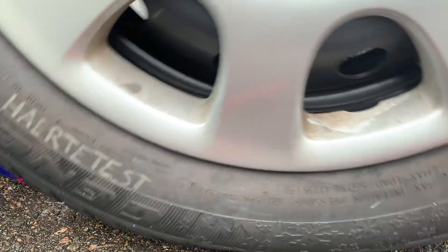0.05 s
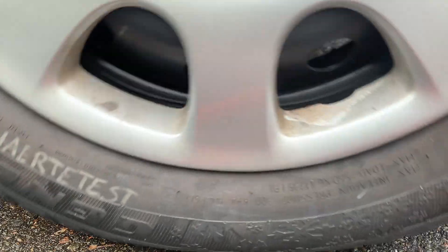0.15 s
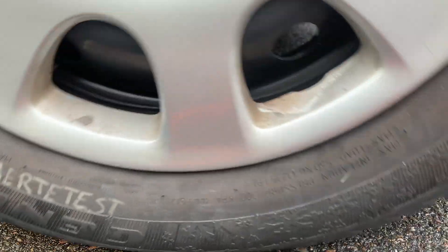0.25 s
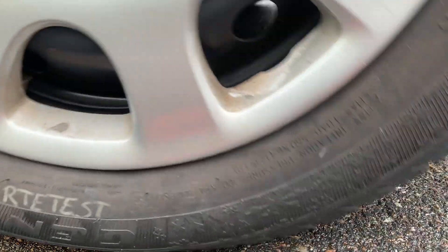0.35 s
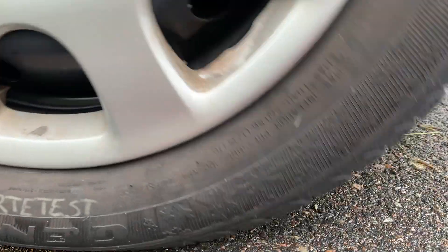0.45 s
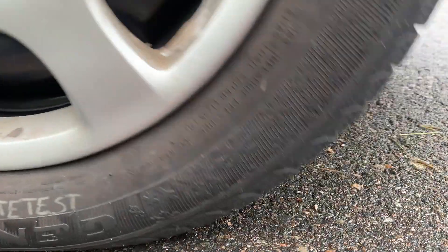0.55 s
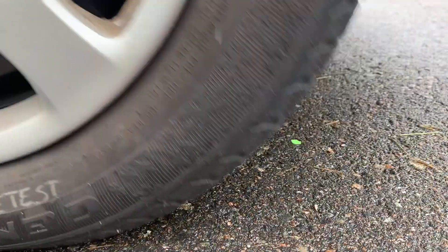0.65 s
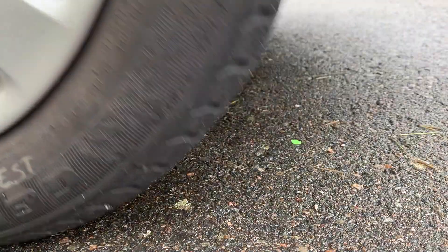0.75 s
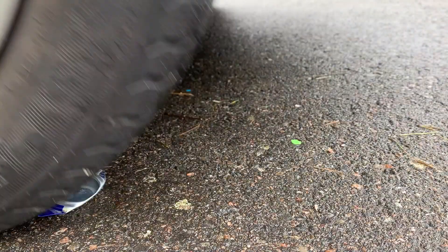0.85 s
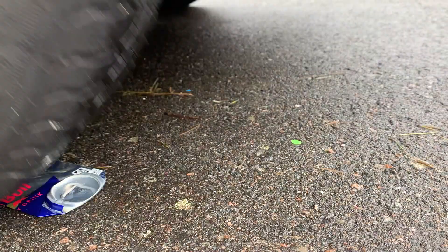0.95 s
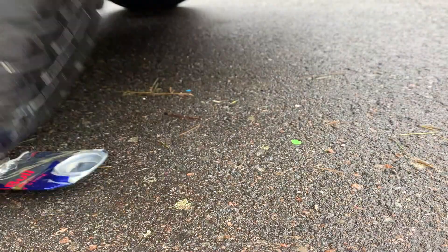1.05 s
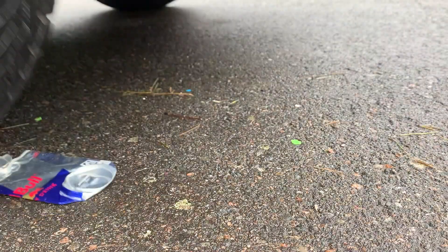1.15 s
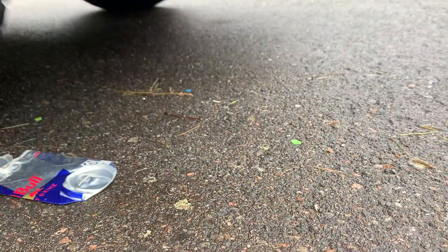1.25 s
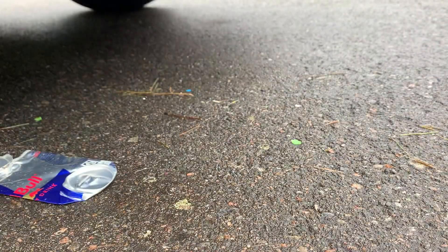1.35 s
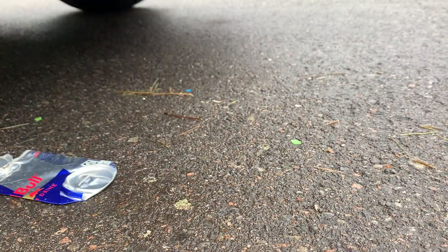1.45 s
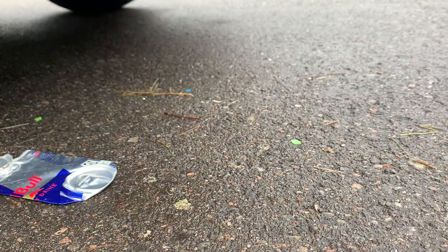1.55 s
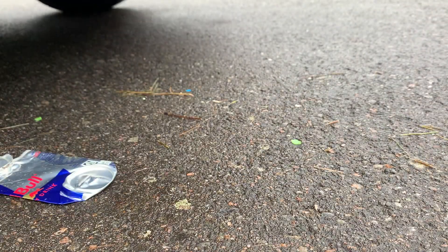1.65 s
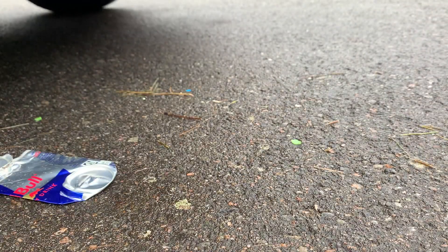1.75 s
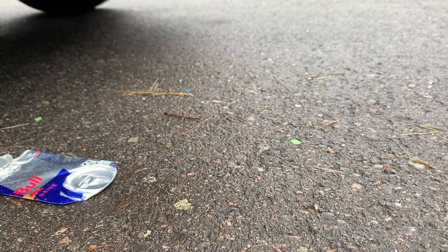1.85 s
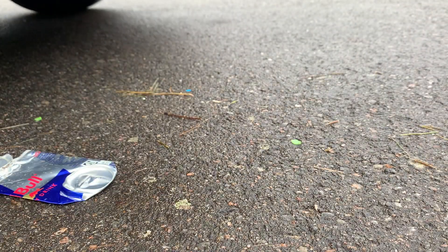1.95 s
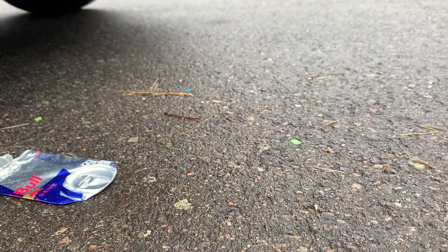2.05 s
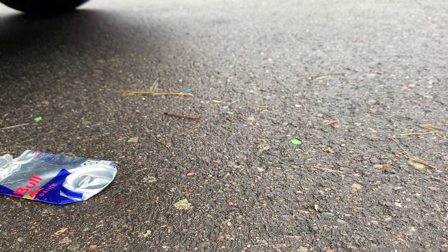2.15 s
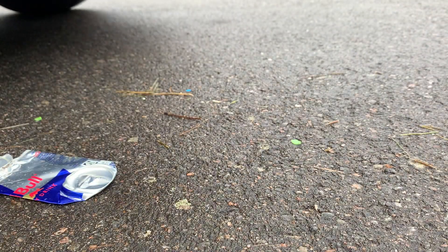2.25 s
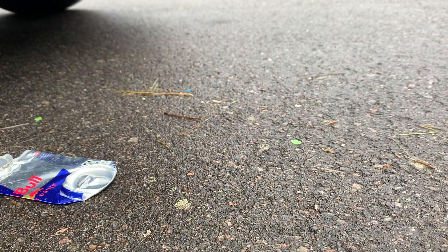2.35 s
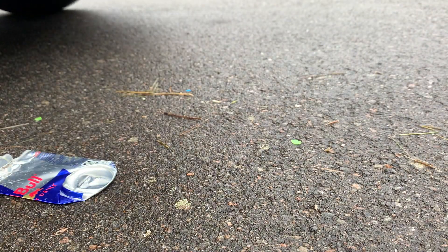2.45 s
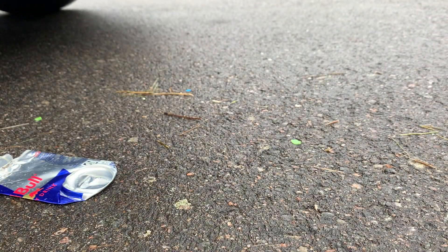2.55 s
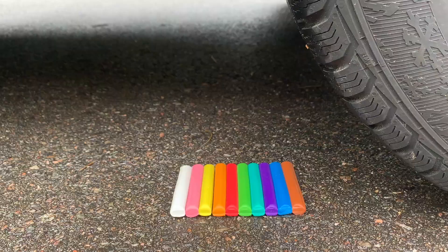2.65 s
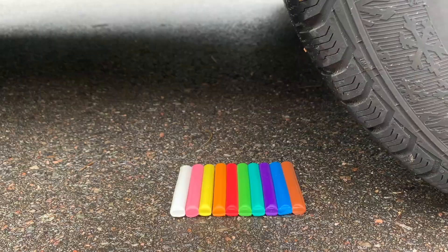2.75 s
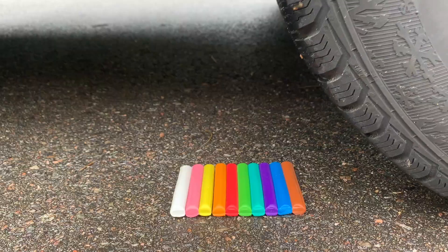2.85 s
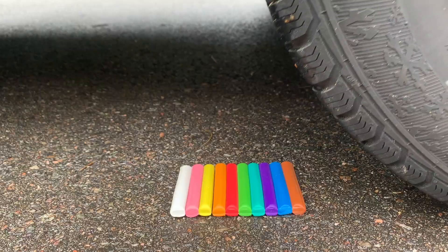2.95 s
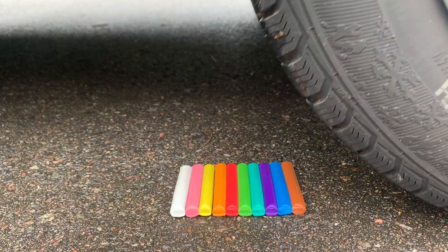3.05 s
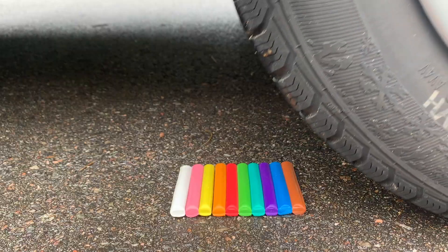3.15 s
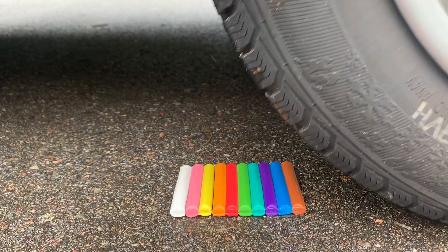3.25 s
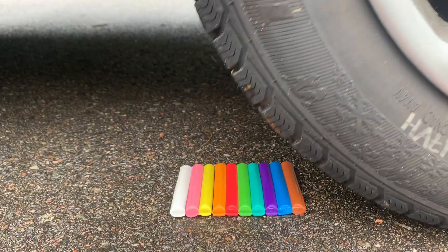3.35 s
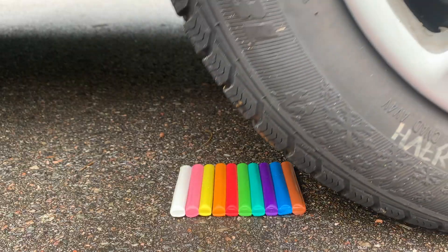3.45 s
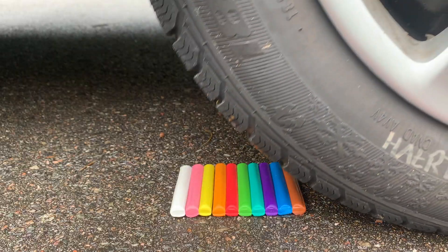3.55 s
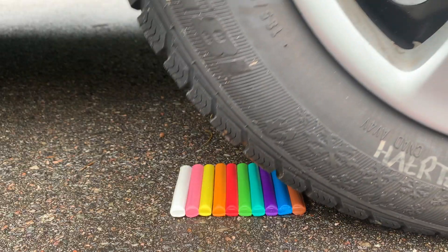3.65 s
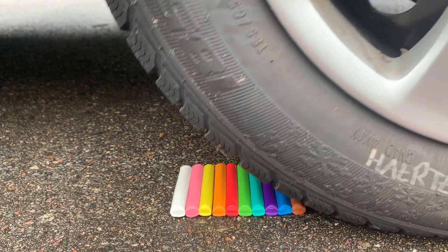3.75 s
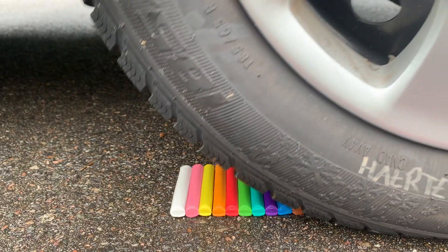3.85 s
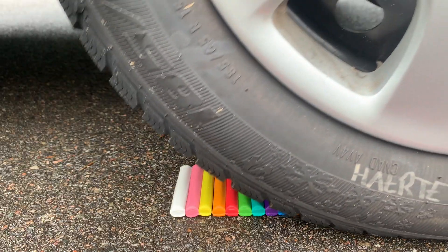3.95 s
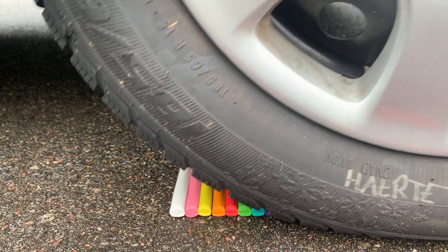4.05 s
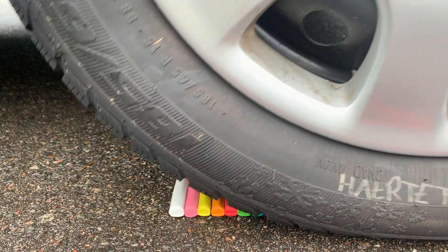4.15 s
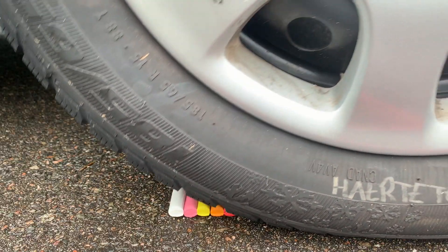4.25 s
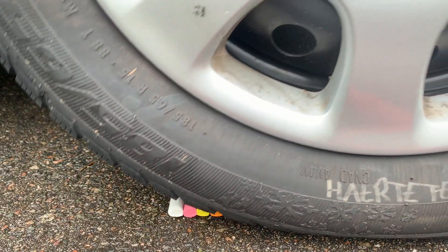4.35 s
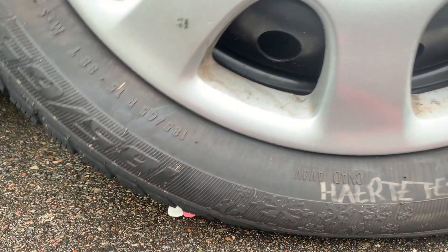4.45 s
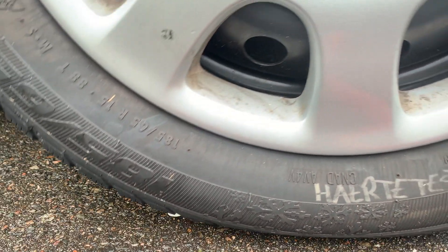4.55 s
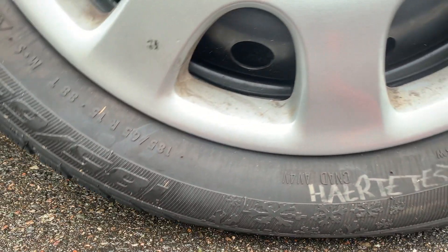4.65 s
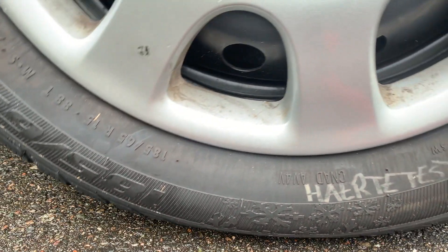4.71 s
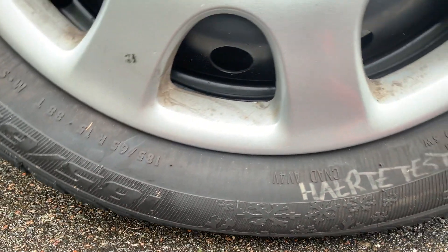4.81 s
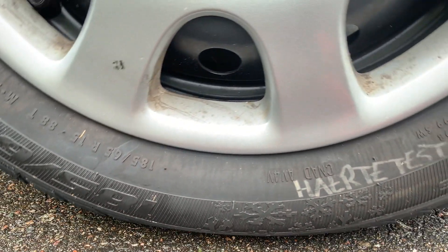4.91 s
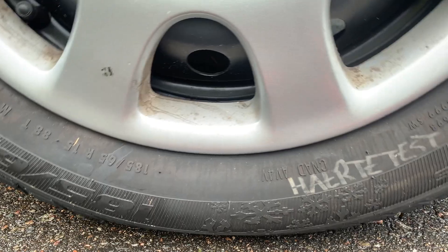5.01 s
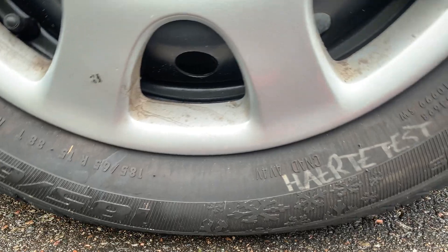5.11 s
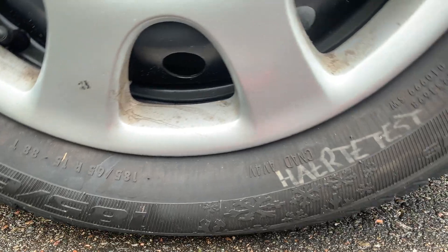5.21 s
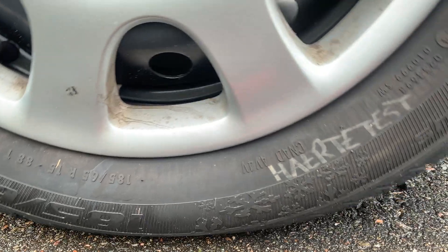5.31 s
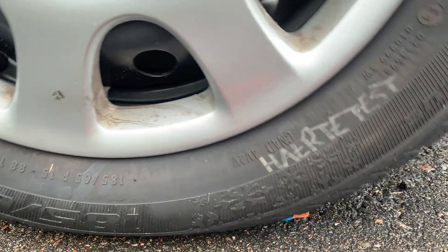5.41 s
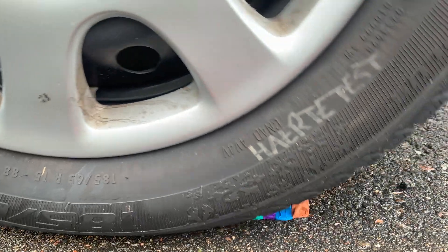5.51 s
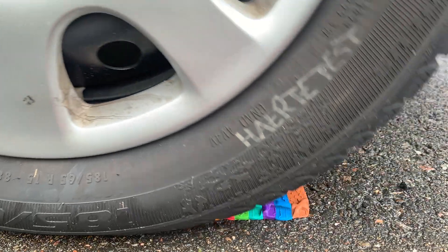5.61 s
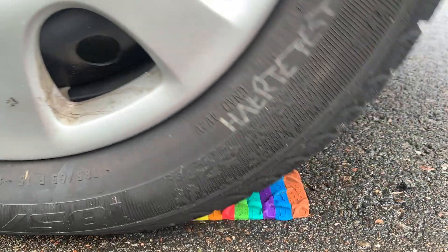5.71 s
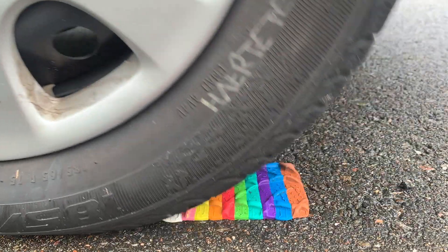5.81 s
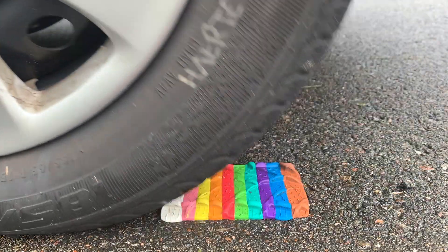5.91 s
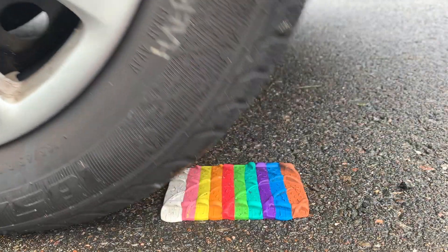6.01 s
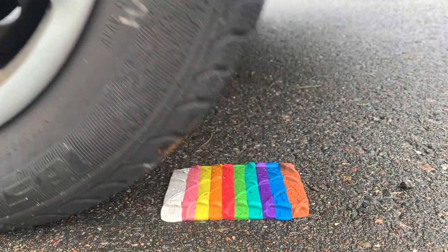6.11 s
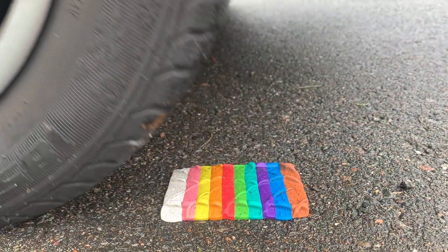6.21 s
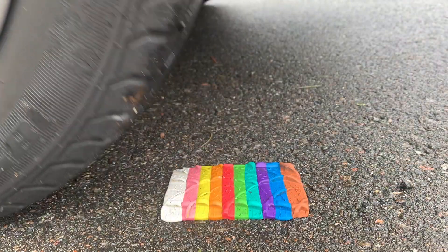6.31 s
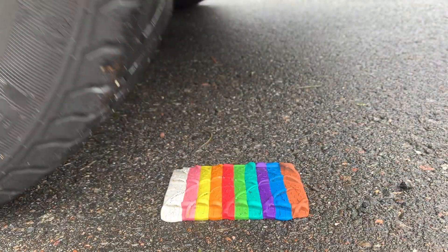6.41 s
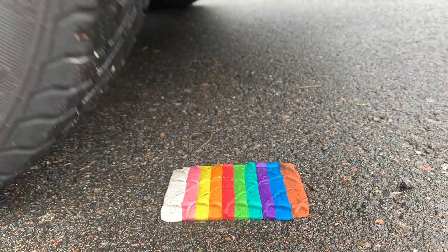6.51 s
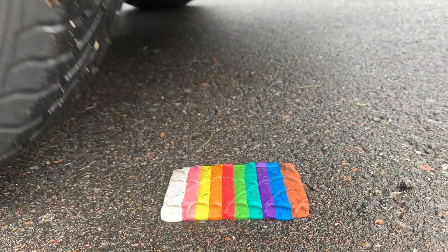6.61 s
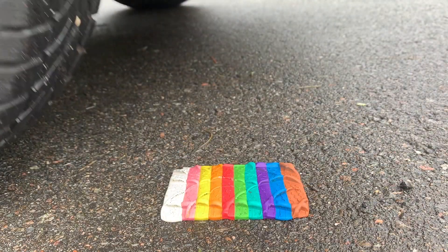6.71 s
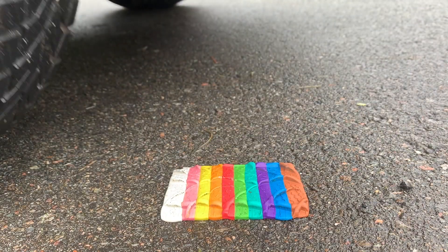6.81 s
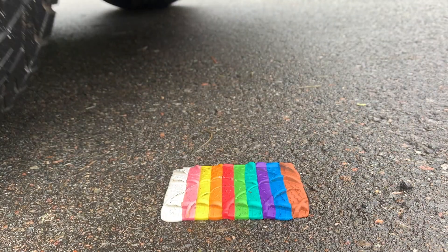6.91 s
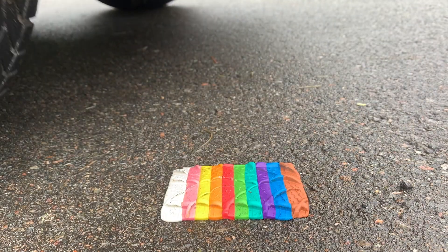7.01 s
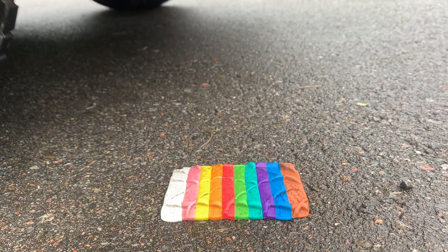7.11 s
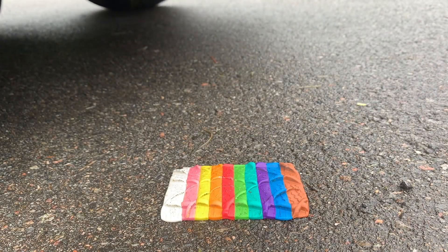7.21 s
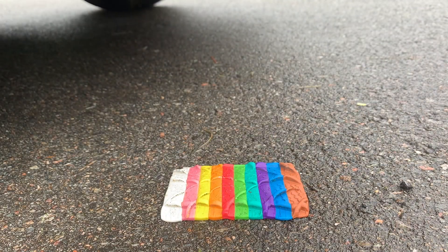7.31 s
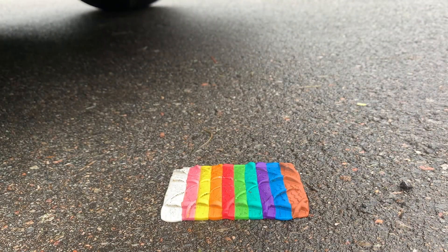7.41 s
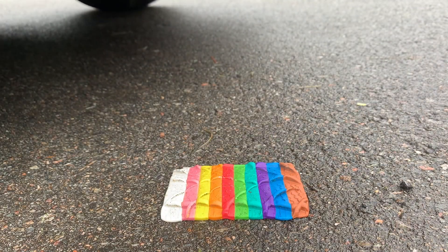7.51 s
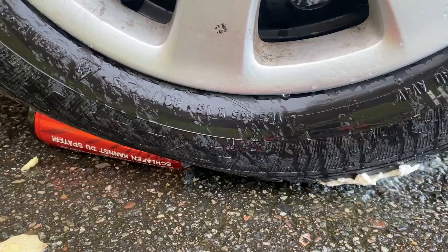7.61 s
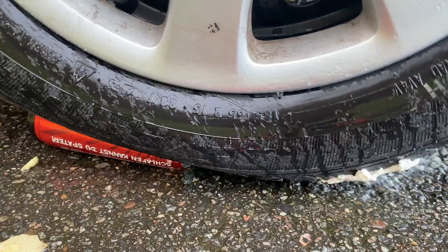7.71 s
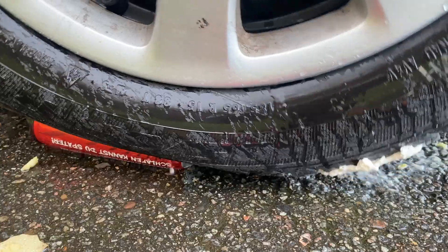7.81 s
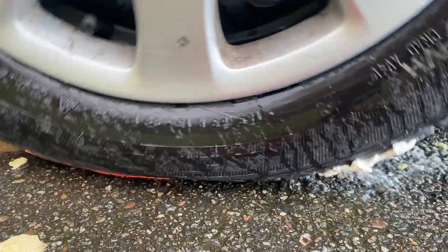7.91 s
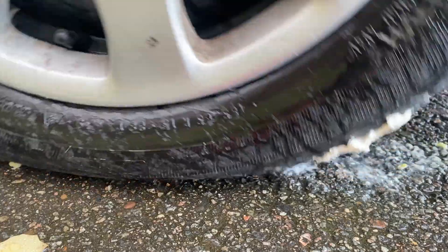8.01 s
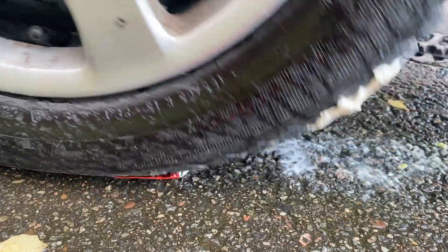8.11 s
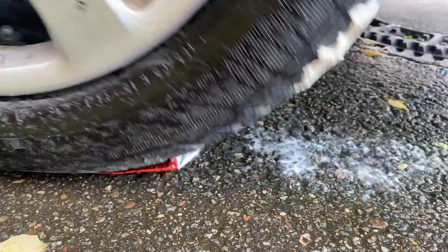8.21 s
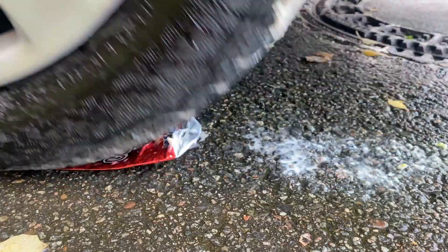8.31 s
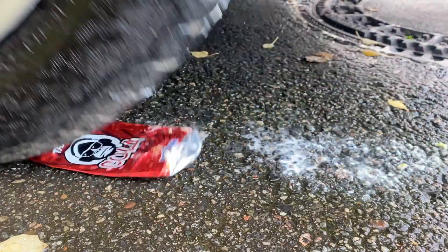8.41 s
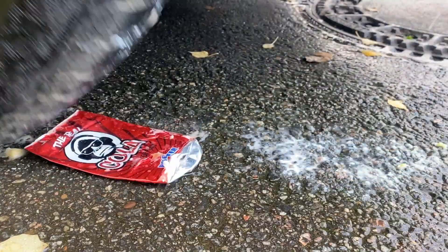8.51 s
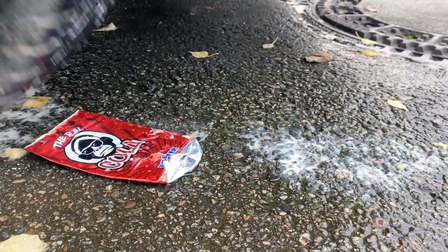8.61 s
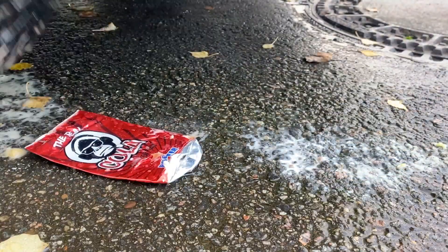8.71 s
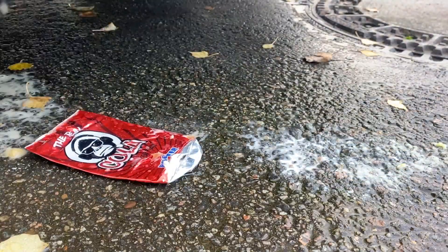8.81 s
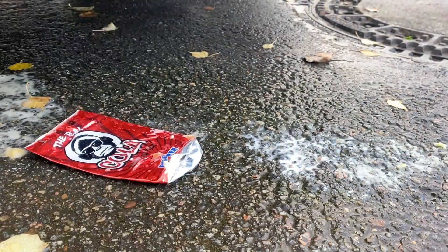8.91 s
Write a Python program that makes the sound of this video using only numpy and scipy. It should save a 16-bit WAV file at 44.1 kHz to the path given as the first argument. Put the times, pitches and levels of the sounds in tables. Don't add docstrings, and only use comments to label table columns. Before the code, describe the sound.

Close stereo sound near the ground beside a slowly moving car on asphalt. From 0 s an empty can is crushed: loud, rapid, hollow metallic buckles, thuds and bright crackles, densest until about 0.6 s, then scattered pops until 1.15 s. Low exhaust throb, rattling and faint hiss continue, with a pipe surge near 0.75 s and a very faint high whine. At 2.7 s the scene cuts to a slower, lumpier idle with soft valve clacks. Soft clay is pressed while sparse grit snaps, mainly 3-5.6 s, with two faint ones after 7 s; the engine grows fuller after 6 s. A click at 7.6 s opens the wet scene. At 7.76 s a tiny falling squeal on the right leads into a sharp, thumping pop at 7.78 s. The engine drops low, then partly returns as crisp metallic ticks cluster from 8 to 8.4 s and thin out by 8.8 s.

```python
import sys
import numpy as np
from scipy import signal
from scipy.fft import rfft, irfft
from scipy.io import wavfile
from scipy.ndimage import uniform_filter1d

SR = 44100
rng = np.random.default_rng(int(sys.argv[2]) if len(sys.argv) > 2 else 0)


def magnitude_from_level(level_db):
    exponent = np.asarray(level_db, float) / 20
    return 10 ** exponent


def file_out(sig):
    cols = np.atleast_2d(sig).T
    lim = np.clip(cols, -1, 1)
    pcm = np.round(lim * 32767).astype(np.int16)
    wavfile.write(sys.argv[1], SR, pcm)


N = 395136
WET_S = 7.615
POP_S = 7.779

SCENES_S = [0, 2.695, 7.615, 9]
# t/s, f/Hz
FIRING = [
    [(0.0, 34.1), (0.16, 32.0), (0.65, 34.6), (0.84, 31.4), (1.98, 28.3), (2.67, 27.9), (2.69, 26.8)],
    [(2.7, 23.7), (3.08, 19.7), (3.23, 20.8), (3.38, 23.4), (3.5, 25.0), (3.76, 25.8), (4.2, 22.8),
     (4.8, 24.7), (5.82, 23.9), (6.3, 26.6), (7.59, 26.8), (7.6, 27.8)],
    [(7.62, 30.7), (8.108, 31.0), (8.478, 38.2), (8.96, 31.1)],
]
# t/s, pipe level/dB, boom level/dB, silencer level/dB, floor pan level/dB
EXHAUST = [
    [(0.0, -23, -40.5, -23, -36), (0.114, -30, -42, -32.5, -45), (0.3, -25.5, -38, -34.5, -42)],
    [(0.45, -30, -50, -31.5, -38.5), (0.75, -13, -38.5, -35, -33.5), (0.9, -30.5, -32, -34.5, -38)],
    [(0.95, -29, -29, -30.5, -33), (1.182, -27.5, -34, -32, -46.5), (1.332, -32.5, -28.5, -30.5, -38.5),
     (2.418, -33.5, -31.5, -33, -40), (2.65, -42, -32.5, -35.5, -39.5), (2.69, -39, -29, -33, -46)],
    [(2.7, -30.5, -45, -47, -48), (2.79, -28.5, -63, -34.5, -53), (2.97, -49, -48, -35, -47.5),
     (3.16, -29.5, -53, -34.5, -58), (3.53, -29, -52.5, -33.5, -43), (3.63, -27, -43.5, -34, -45),
     (4.13, -33, -51.5, -36, -57), (4.2, -23, -62.5, -32, -73), (4.23, -27.5, -54.5, -38, -50),
     (4.99, -29.5, -49, -34, -48.5), (5.89, -27.5, -39.5, -34.5, -40.5), (6.32, -25.5, -40.5, -28.5, -33.5),
     (7.44, -25.5, -46.5, -30, -34.5), (7.6, -27.5, -40, -29, -31)],
    [(7.62, -33.5, -39.5, -38.5, -43), (7.72, -34.5, -47, -43, -51), (7.76, -32.5, -39.5, -44.5, -61)],
    [(7.83, -56, -45, -56, -60), (7.936, -56, -71.5, -49.5, -58), (8.358, -34, -59, -40, -43.5),
     (8.96, -44, -48.5, -42.5, -46)],
]
# f/Hz, width/Hz
TUBES = [
    [(147.9, 33.3), (29.1, 12), (83.4, 61), (265.5, 58)],
    [(153.5, 34), (25.5, 23), (78.3, 37.4), (280, 99)],
    [(140, 36), (35, 20), (72, 41), (258.5, 80)],
]
# t/s, rattle level/dB, hiss level/dB
BAY = [
    [(0.0, -39.5, -55.5), (0.39, -35, -47), (0.84, -37.5, -57.5), (1.83, -42, -62.5), (2.69, -43, -65)],
    [(2.7, -39.5, -60), (2.93, -41, -61), (3.65, -40, -60.5), (3.8, -40, -60.5), (5.46, -42, -63.5),
     (5.99, -42.5, -64), (6.49, -40, -63), (7.01, -43.5, -63), (7.6, -44, -63.5)],
    [(7.62, -41, -58), (7.75, -53.5, -59.5), (8.96, -51.5, -65.5)],
]
# f/Hz, density/(dB per Hz)
RATTLE = [(200, -27.5), (330, -10), (400, -6.5), (460, -11), (530, -3), (620, -2), (720, -15), (870, -12.5),
          (990, -20), (1140, -15.5), (1470, -29.5), (2000, -32.5), (3000, -74.5)]
# f/Hz, density/(dB per Hz)
WET_RATTLE = [(190, -37.5), (330, -9.5), (531, -4.5), (594, -10), (873, -11), (1090, -26), (2000, -31),
              (2600, -46.5), (4400, -120)]
# f/Hz, density/(dB per Hz)
HISS = [(710, -33), (1200, -15.5), (1480, -10.5), (1790, -8), (3640, -18.5), (4540, -24.5), (5160, -40),
        (6170, -19), (6860, -35.5), (7230, -65.5), (7870, -25.5), (8390, -18), (15000, -55)]
# f/Hz, density/(dB per Hz)
SPRAY = [(760, -45.5), (1300, -3), (1860, -6.5), (3090, -8.5), (4420, -10), (8430, -22), (10600, -8.5),
         (12200, -46), (13000, -38)]
# t/s, level/dB
WHINE = [(1.1, -67), (1.62, -89), (1.9, -73), (3.25, -88), (4.49, -80), (5.3, -92), (7.56, -85), (7.6, -77)]
# t/s, peak level/dB
TAPPET = [(0, -62), (2.69, -58), (2.7, -44), (4.0, -43), (5.0, -46), (7.6, -52), (7.62, -80)]
# t/s, peak level/dB, centre f/Hz, low part re peak level/dB
GRIT = [(1.4398, -36, 2350, -19), (2.069, -49, 2500, -12), (3.059, -31, 8370, -22), (3.957, -32, 2100, -24),
        (4.0447, -34, 9060, -13), (4.1639, -38.5, 2200, -7), (4.1835, -39, 3060, -13),
        (4.2024, -49.5, 2610, 1), (4.2247, -43, 2640, -4), (4.324, -29.5, 2100, -11),
        (4.5464, -31, 8440, -15), (4.6167, -34, 2570, -2), (4.6533, -39, 2130, -9),
        (4.702, -35.5, 8470, -17), (4.9656, -30, 8500, 0), (5.048, -40, 2050, 11),
        (5.1145, -38.5, 8200, -10), (5.5697, -37, 2000, 5.5), (5.6166, -39, 2465, -20.5),
        (7.0015, -44.5, 2090, -14), (7.3068, -44.5, 2230, -21)]
# t/s, peak level/dB, centre f/Hz, low part re peak level/dB
TICKS = [(7.7089, -25, 10100, -10), (7.855, -41, 2000, -3), (7.873, -34, 2320, -2),
         (7.8925, -36, 3110, -15), (7.9428, -28.5, 3900, -27), (8.0098, -22.5, 2100, -36),
         (8.0808, -24, 4400, -5), (8.1014, -14, 2090, -16), (8.1152, -27, 3300, 8), (8.1294, -33, 2070, 7),
         (8.1432, -29, 2750, -3), (8.177, -27.5, 2230, -3), (8.2259, -20, 3580, -24),
         (8.2457, -27, 2030, -5), (8.2576, -25.5, 4260, -26), (8.298, -26.5, 3380, -35),
         (8.317, -26, 2860, -19), (8.327, -30, 4030, -19), (8.3446, -29.5, 9610, -19),
         (8.3994, -85, 2600, -27), (8.3991, -19, 2120, -42), (8.5098, -29, 4050, -20),
         (8.522, -32.5, 2200, -30), (8.5515, -41, 3090, -18), (8.6172, -40, 2180, -38),
         (8.6443, -52, 2080, -10), (8.7106, -33, 3980, -15), (8.7241, -40, 4030, -12),
         (8.7939, -58, 2040, -14)]
# t/s, level/dB
CRINKLE = [
    [(0.0, -17), (0.12, -41), (0.256, -23), (0.41, -15.5), (0.55, -32.5), (0.638, -44.5), (0.824, -44),
     (1.2, -53)],
    [(7.7, -60), (8.248, -52.5), (8.492, -85), (8.6, -70)],
]
# f/Hz, density/(dB per Hz)
FOIL = [(350, -35), (600, -7.5), (746, -5), (1180, -12), (1620, -16.5), (2310, -12), (2830, -12),
        (3920, -16), (7330, -44), (8290, -26), (11800, -29.5), (13500, -31), (15500, -55.5)]
# t/s, peak level/dB, wall mode f/Hz, thud re wall level/dB, crack re wall level/dB
BUCKLES = [(0.002, -8.5, 972, -3, -16), (0.019, -23.5, 980, 0.5, -16), (0.062, -3, 1180, 5.5, -20.5),
           (0.072, 2.5, 830, -5.5, -40.5), (0.103, -13.5, 1020, -11, -27), (0.146, -37, 1000, -13, -15.5),
           (0.172, -33.5, 1090, -6, 13), (0.199, -24, 1140, -24, -6.5), (0.209, -12, 1100, -20, -12.5),
           (0.246, -22, 1210, -15, -10), (0.264, -10, 1343, -6, -3), (0.284, -7.5, 1270, -6, -17.5),
           (0.299, -5, 1260, -13, -25), (0.326, -18.5, 1350, -21, -22), (0.338, 1.5, 1200, -10.5, -8.5),
           (0.345, -8, 1230, -2, -3.5), (0.355, -3, 1210, -6, -45), (0.366, -6.5, 1170, 5.5, -23),
           (0.382, -7.5, 1270, -16, -22), (0.394, -16.5, 1100, -17.5, -17.5), (0.403, -7, 1360, -33, -9.5),
           (0.425, -6, 1200, -28.5, -16.5), (0.437, -20, 1230, -4, -5), (0.456, -19.5, 1160, -18, -8.5),
           (0.492, -5, 1260, -34, -21.5), (0.516, -14, 1220, -32, -9.5), (0.529, -1.5, 1800, -30, -19),
           (0.549, -13, 1780, -9, -8.5), (0.56, -16.5, 1790, -11, -15), (0.588, -27.5, 1300, -5, -10),
           (0.621, -18.5, 1130, 0, -12), (0.701, -30.5, 835, 3, -24), (0.713, -25, 1290, -14.5, -3),
           (0.728, -17.5, 1210, -8, -3.5), (0.748, -20, 1060, -24, -2), (0.769, -7.5, 1750, -10, -47),
           (0.815, -17.5, 860, -26, -17), (0.83, -10.5, 1390, -35, -40.5), (0.899, -36.5, 1296, 9, 4),
           (0.926, -11.5, 1210, -9, 3.5), (0.93, -17.5, 1100, -6, -15), (1.061, -10, 1730, -29, -9),
           (1.109, -19, 1630, -9.5, -4), (1.153, -27.5, 798, 3, -46)]
# t/s, peak level/dB, centre f/Hz
CREASES = [(0.0628, -13, 8000), (0.0734, -26, 8110), (0.1037, -37, 8060), (0.1705, -22, 8200),
           (0.1874, -12.5, 8100), (0.1974, -9.5, 3670), (0.2114, -11.5, 8300), (0.2448, -17.5, 8020),
           (0.2638, -9, 3770), (0.2754, -13.5, 7900), (0.2987, -14, 3640), (0.3244, -22, 8100),
           (0.3356, -8.5, 3830), (0.3461, -10.5, 3980), (0.3681, -9.5, 3730), (0.3814, -17.5, 3670),
           (0.404, -28, 3950), (0.4249, -9.5, 8220), (0.4384, -10.5, 7900), (0.4564, -15, 3320),
           (0.4933, -6, 3170), (0.5172, -11.5, 3150), (0.5234, -21.5, 3510), (0.5314, -18.5, 3000),
           (0.5601, -30, 3990), (0.5886, -23.5, 3280), (0.6225, -23, 8090), (0.7113, -30, 4190),
           (0.7272, -19.5, 3680), (0.7462, -14.5, 3550), (0.7662, -27, 3770), (0.815, -12.5, 3850),
           (0.8989, -42, 8160), (0.9248, -13, 8160), (1.0615, -18, 8200), (1.1099, -22.5, 4010),
           (1.1513, -44, 6030)]
# t/s, f/Hz, level/dB
SQUEAL = [
    (7.758, 1176, -50.5),
    (7.764, 1163, -25),
    (7.769, 1211, -14),
    (7.778, 1162, -12.5),
    (7.781, 909, -9),
    (7.785, 620, -21.5),
]
# multiple of f, level/dB
SQUEAL_ORDERS = [(1, 0), (2, -26), (3, -25), (4.65, -30)]
# f/Hz, phase/rad
PORT_TURN = [(20, 0.39), (150, 0.83), (500, 0.38), (1200, 0.74), (4000, 0.63)]
# f/Hz, gain/dB
MICROPHONE = [(20, 0.5), (10500, -4.5), (11800, -9.5), (13500, -14.5), (15500, -19.5), (20000, -60.5)]


def set_rms(x, db=0):
    return x * magnitude_from_level(db) / np.sqrt(np.mean(x ** 2))


def curves(tables):
    s, *columns = np.concatenate(tables).T
    t = np.arange(N) / SR
    return [np.interp(t, s, column) for column in columns]


def ring(x, hz, width_hz):
    return signal.lfilter(*signal.iirpeak(hz, hz / width_hz, fs=SR), x)


def colour(x, table):
    hz, db = np.transpose(table)
    grid_hz = np.linspace(1, SR / 2, 1025)
    log_gain = np.interp(np.log(grid_hz), np.log(hz), db) * np.log(10) / 20
    cepstrum = irfft(log_gain)
    cepstrum[1:1024] *= 2
    cepstrum[1025:] = 0
    impulse = irfft(np.exp(rfft(cepstrum)))
    return signal.oaconvolve(x, impulse)[:N]


def walk(rate_hz):
    k = int(SR / rate_hz)
    held = np.repeat(rng.standard_normal(N // k + 1), k)
    return 1.3 * uniform_filter1d(uniform_filter1d(held, k), k)[:N]


def add(out, s, x):
    i = int(s * SR)
    out[i:i + len(x)] += x[:len(out) - i]


def mode(hz, t60_s, rise_s=0.00014):
    t = np.arange(int(t60_s * SR)) / SR
    decay = 1000 ** (-t / t60_s)
    return np.sin(2 * np.pi * hz * t) * decay * (1 - np.exp(-t / rise_s))


def crack(hz, t60_s, width=.5, broad_db=-8, tail_db=-22, rise_s=0.00095):
    t = np.arange(int(.05 * SR)) / SR
    swell = (1 - np.exp(-t / rise_s)) ** 2
    decay = 1000. ** (-t / t60_s) + magnitude_from_level(tail_db) * np.exp(-t / .009)
    x = rng.standard_normal(len(t)) * swell * decay
    x = ring(x, hz, width * hz) + magnitude_from_level(broad_db) * ring(x, 3300.0, 11000.0)
    return x / np.abs(x).max()


def ports(x, lag_samples, spread):
    t = np.arange(int(.02 * SR)) / SR
    echo = rng.standard_normal((2, len(t))) * np.exp(-t / .003)
    echo *= spread / np.sqrt(np.sum(echo ** 2, axis=1, keepdims=True))
    n = np.arange(N)
    lag_samples = lag_samples * np.where(n > WET_S * SR, .45, 1)
    late = np.interp(n - lag_samples, n, x)
    scattered = signal.lfilter(*signal.butter(2, 500, "high", fs=SR), x)
    return np.array([x, late]) + signal.oaconvolve(scattered[None], echo, axes=1)[:, :N]


def bay_noise(dry_table, wet_table, db, lag_samples, apart_db):
    wet = np.arange(N) > WET_S * SR
    parts = []
    for noise in rng.standard_normal((3, N)):
        on_wet = set_rms(colour(noise, wet_table))
        on_dry = set_rms(colour(noise, dry_table))
        parts.append(np.where(wet, on_wet, on_dry) * magnitude_from_level(db))
    shared, *apart = parts
    return ports(shared, lag_samples, spread=0.15) + magnitude_from_level(apart_db) * np.array(apart)


def engine_bay(turns):
    throb = np.cos(2 * np.pi * (turns - .15))
    rattle_db, hiss_db = curves(BAY)
    rattle_db = rattle_db - 0.5 + 0.91 * throb + 1.37 * walk(9)
    hiss_db = hiss_db + 4 + .6 * throb + .9 * walk(14)
    rattle = bay_noise(RATTLE, WET_RATTLE, rattle_db, lag_samples=11.6, apart_db=-5.5)
    hiss = bay_noise(HISS, SPRAY, hiss_db, lag_samples=13.6, apart_db=1.5)
    return rattle + hiss


def alternator():
    whine_hz = 6015
    t = np.arange(N) / SR
    tone = np.sin(2 * np.pi * whine_hz * t) + magnitude_from_level(-14) * np.sin(4 * np.pi * whine_hz * t)
    db = curves([WHINE])[0] + 4 + 2.5 * walk(6)
    return magnitude_from_level(db) * tone * (t > WHINE[0][0]) * (t < WET_S)


def tappet(turns):
    clack_s = 3.812
    out = np.zeros(N)
    cycle = np.floor((turns - turns[int(clack_s * SR)]) / 4)
    db, = curves([TAPPET])
    for i in np.flatnonzero(np.diff(cycle)):
        clack = crack(2300., t60_s=.03, width=.8, broad_db=-30, tail_db=-30, rise_s=.002)
        add(out, i / SR, magnitude_from_level(db[i] + 2 * rng.standard_normal()) * clack)
    return ring(ring(out, 2300, 2200), 2300, 2600)


def exhaust(turns, levels_db):
    firing = np.diff(np.floor(turns), prepend=0)
    size_db = 1.0 * rng.standard_normal(400)
    puffs = firing * magnitude_from_level(size_db[turns.astype(int)]) + .007 * rng.standard_normal(N)
    out = np.zeros(N)
    for tubes, start_s, end_s in zip(TUBES, SCENES_S, SCENES_S[1:]):
        part = slice(int(start_s * SR), int(end_s * SR))
        for (hz, width_hz), db in zip(tubes, levels_db):
            steep = ring(puffs, hz, width_hz)
            steep = ring(steep, hz, 1.4 * width_hz)
            steep = ring(steep, hz, 2 * width_hz)
            out[part] += magnitude_from_level(db[part]) * set_rms(steep[part])
    return out


def engine():
    hz, = curves(FIRING)
    turns = np.cumsum(hz * (1 + .004 * walk(20))) / SR
    levels_db = curves(EXHAUST)
    rumble = set_rms(ring(ring(rng.standard_normal(N), 54, 72), 45, 130))
    rumble = magnitude_from_level(-4.5 + levels_db[2]) * rumble
    low = ports(exhaust(turns, levels_db) + rumble, lag_samples=13, spread=.1)
    clacks = ports(tappet(turns), lag_samples=8, spread=.3)
    return low + alternator() + clacks + engine_bay(turns)


def ticks():
    out = np.zeros(N)
    for s, db, hz, low_db in GRIT:
        add(out, s, magnitude_from_level(db - 1.5) * crack(hz, t60_s=.008, width=.3, broad_db=-14, tail_db=-26))
        add(out, s, magnitude_from_level(db + low_db - 6) * mode(1150, t60_s=.015))
    for s, db, hz, low_db in TICKS:
        add(out, s, magnitude_from_level(db + 1.5) * crack(hz, t60_s=.007, width=.25, broad_db=-11, tail_db=-26))
        add(out, s, magnitude_from_level(db + low_db - 1.5) * mode(1050, t60_s=0.01))
    click = crack(2000., t60_s=.002, width=1.5, broad_db=-6, tail_db=-50, rise_s=.0001)
    add(out, WET_S, magnitude_from_level(-21) * click)
    return ports(out, lag_samples=14, spread=0.53)


def crinkle():
    t = np.arange(N) / SR
    swell = 0
    for table in CRINKLE:
        s, db = np.transpose(table)
        swell = swell + magnitude_from_level(np.interp(t, s, db, left=-120, right=-120))
    folds_per_s = 400
    folds = (rng.random((2, N)) < folds_per_s / SR) * magnitude_from_level(4.3 * rng.exponential(size=(2, N)))
    grain = rng.standard_normal(300) * np.exp(-np.arange(300) / 50.)
    sides = []
    for fold in folds:
        foil = colour(signal.oaconvolve(fold, grain)[:N], FOIL)
        sides.append(swell * set_rms(foil, -2.3))
    near, far = sides
    return ports(near, lag_samples=10, spread=0.11) + ports(far, lag_samples=-2, spread=0.47) * magnitude_from_level(-7.5)


def empty_can():
    out = np.zeros(N)
    chance = rng.random((len(BUCKLES), 3))
    for (s, db, hz, thud_db, crack_db), (a, b, c) in zip(BUCKLES, chance):
        add(out, s, magnitude_from_level(db - 3) * mode(hz, t60_s=0.019, rise_s=0.00039))
        neighbour = crack(hz * (.7 + 1.2 * b), t60_s=.025, width=.25, broad_db=-30, tail_db=-16)
        add(out, s + .002 * a, magnitude_from_level(db - 6) * neighbour)
        add(out, s, magnitude_from_level(db + thud_db - 3.5) * mode(225 + 50 * c, t60_s=0.067, rise_s=0.0014))
        add(out, s + 0.0012, magnitude_from_level(db + thud_db - 4) * mode(330 + 200 * a, t60_s=.025, rise_s=.001))
        add(out, s, magnitude_from_level(db + crack_db - 5) * crack(3900., t60_s=.012, width=.25, broad_db=-10))
    for s, db, hz in CREASES:
        add(out, s, magnitude_from_level(db - 1) * crack(hz, t60_s=.011, width=.15, broad_db=-13, tail_db=-24))
    return ports(out, lag_samples=10, spread=0.72)


def seam_squeal():
    hz, db = curves([SQUEAL])
    t = np.arange(N) / SR
    phase = 2 * np.pi * np.cumsum(hz) / SR
    on = (t > SQUEAL[0][0]) & (t < SQUEAL[-1][0])
    partials = sum(magnitude_from_level(k_db) * np.sin(k * phase) for k, k_db in SQUEAL_ORDERS)
    return on * magnitude_from_level(db + 8.5) * partials


def full_can():
    out = np.zeros(N)
    add(out, POP_S - .010, magnitude_from_level(-38.5) * crack(5000., t60_s=.008, width=1.2))
    add(out, POP_S - .001, magnitude_from_level(-9) * crack(2000.0, t60_s=0.0033, width=1.0, broad_db=-9, tail_db=-25))
    add(out, POP_S + 0.00041, magnitude_from_level(-3.5) * mode(920, t60_s=0.0068))
    add(out, POP_S + 0.00334, magnitude_from_level(3) * mode(330, t60_s=0.005))
    add(out, POP_S + .0045, -magnitude_from_level(-10) * mode(91, t60_s=0.058, rise_s=0.0011))
    add(out, POP_S + 0.014, magnitude_from_level(-8.5) * mode(25, t60_s=0.071, rise_s=0.0024))
    pop = ports(out, lag_samples=4, spread=0.43) * magnitude_from_level([[1.5], [-1.5]])
    return pop + seam_squeal() * magnitude_from_level([[-14], [0]])


def scene():
    return engine() + ticks() + crinkle() + empty_can() + full_can()


def low_pass(x):
    return signal.sosfilt(signal.butter(12, 15710, fs=SR, output="sos"), x)


def record(dry):
    early = np.arange(N) < WET_S * SR
    hz, turn_rad = np.transpose(PORT_TURN)
    bin_hz = np.arange(N // 2 + 1) * SR / N
    turn_rad = np.interp(np.log(1 + bin_hz), np.log(hz), turn_rad)
    turned = irfft(rfft(dry[0]) * np.exp(-1j * turn_rad), N)
    left = np.where(early, magnitude_from_level(1.0) * (turned - .75 * ring(turned, 8500, 1500)), dry[0])
    right = dry[1] + 1.6 * early * ring(dry[1], 8200, 600)
    heard = np.array([colour(left, MICROPHONE), colour(right, MICROPHONE)])
    heard = heard - .7 * early * ring(heard, 7200, 1100)
    dull = signal.sosfilt(signal.butter(3, 12000, fs=SR, output="sos"), heard)
    heard = np.where(early, heard, dull)
    return low_pass(np.tanh(heard))


dry = scene()
out = record(dry)
file_out(out)
```